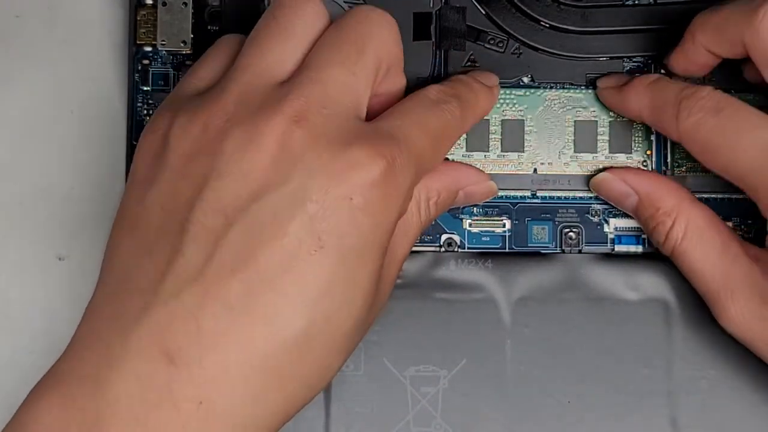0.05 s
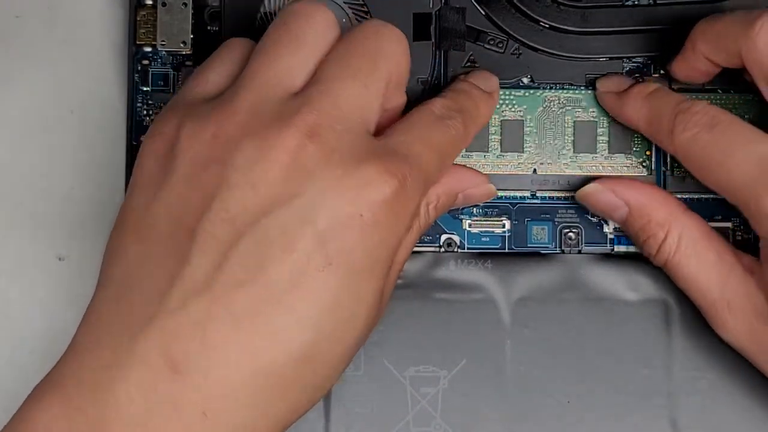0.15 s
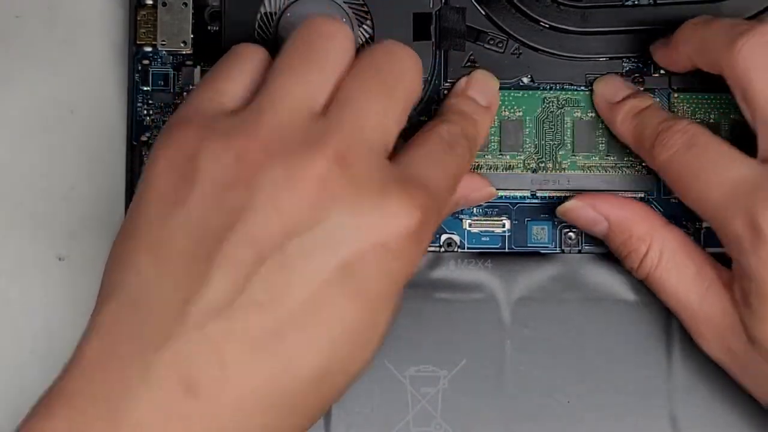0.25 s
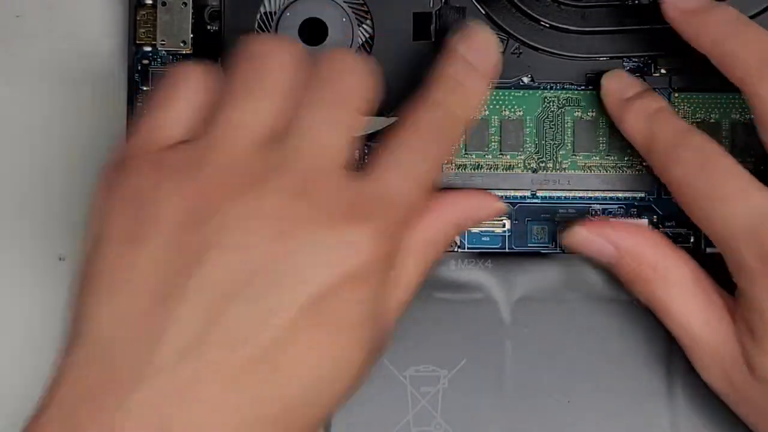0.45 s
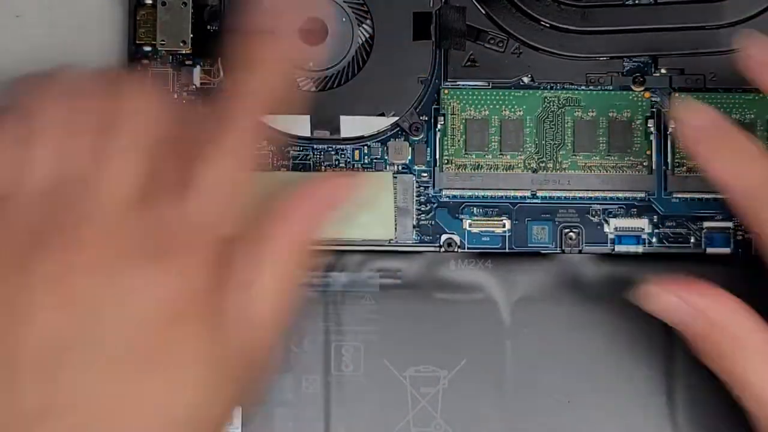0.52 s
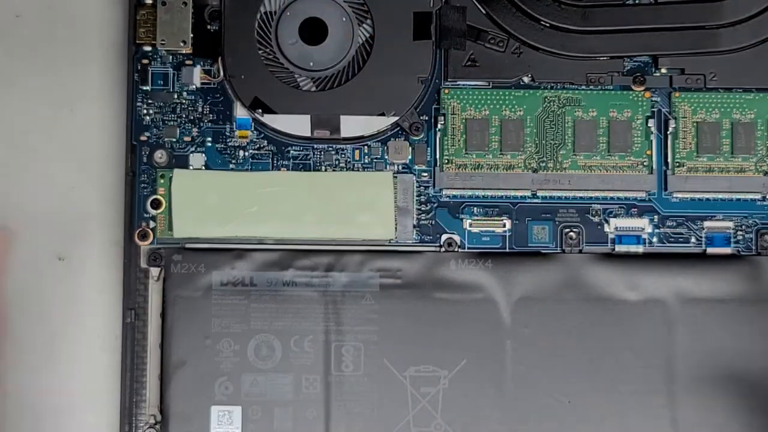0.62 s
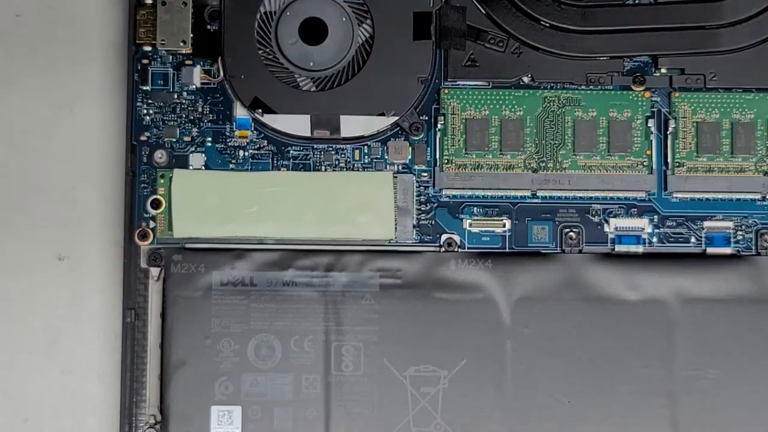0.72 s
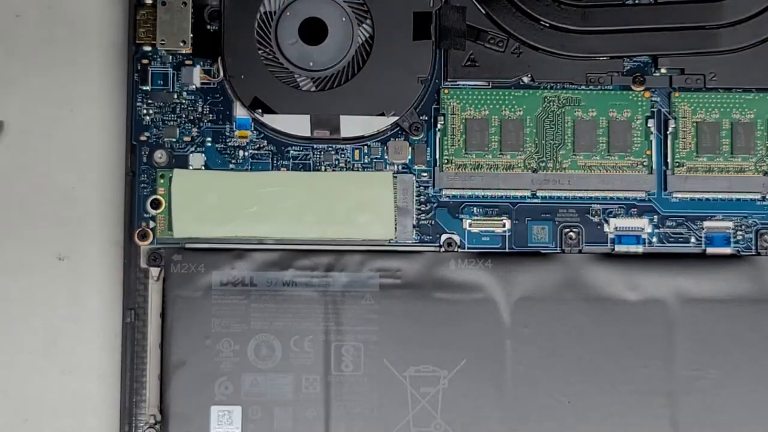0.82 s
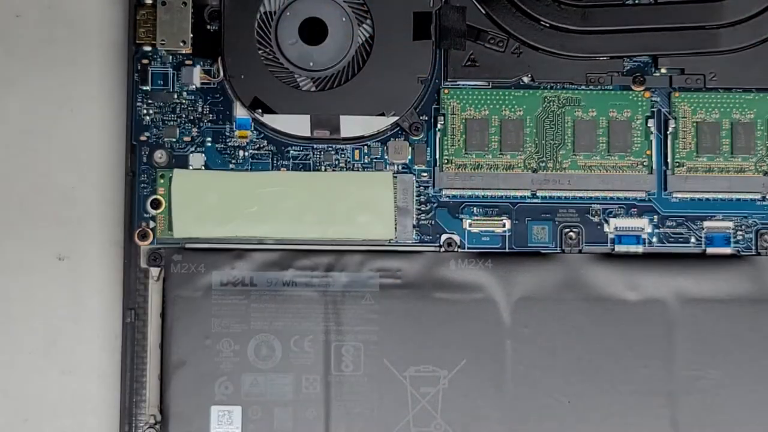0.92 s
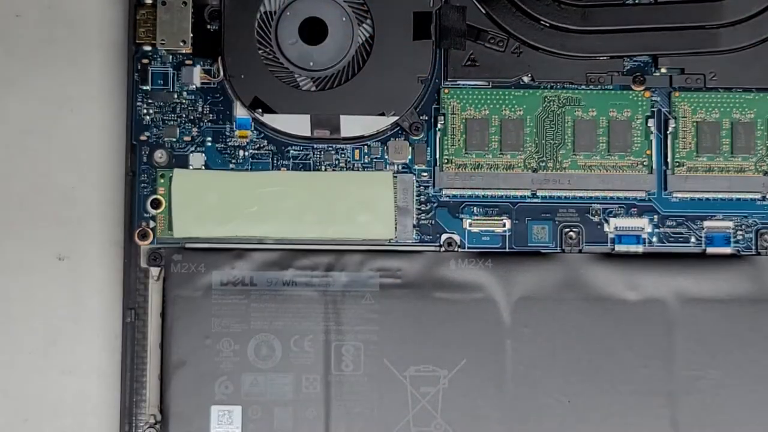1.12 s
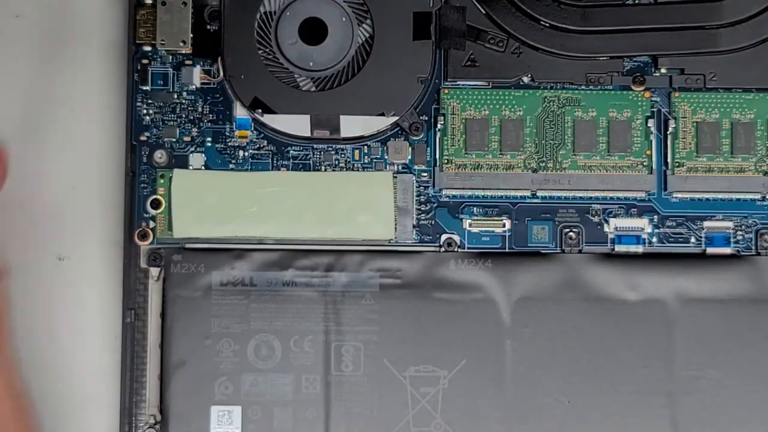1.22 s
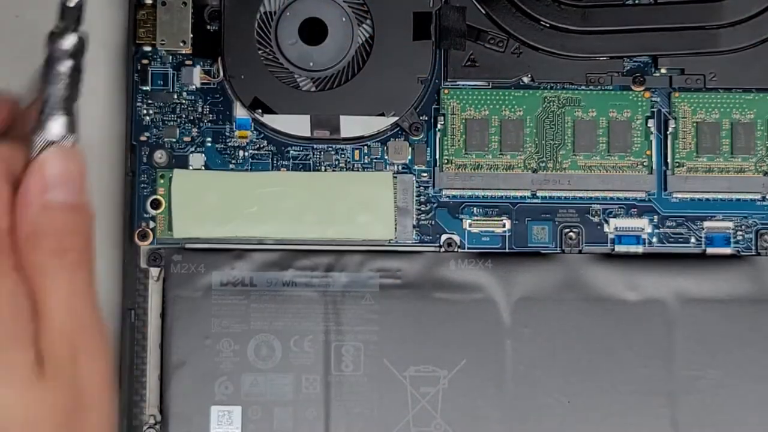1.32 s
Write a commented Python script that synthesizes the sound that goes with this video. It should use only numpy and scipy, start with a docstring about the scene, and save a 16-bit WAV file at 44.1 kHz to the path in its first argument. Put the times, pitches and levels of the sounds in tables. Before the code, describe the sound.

A memory module snaps into its laptop slot with a quick run of sharp latch clicks. Faint ticks, soft desk bumps and a dull rub follow as small things are handled, heard close in a small room with low rumble.

```python
"""Spring latches snap shut on a memory module pushed into its slot in an open laptop on a desk:
a quick run of cracks that ring the board, a brief hiss swelling into the first loud one. Later, small
things handled nearby give faint ticks, soft bumps and a dull rub. Low room rumble and faint hiss lie
underneath. Heard in a small room through two spaced microphone ports."""
import sys
import numpy as np
from scipy import signal
from scipy.fft import rfft, irfft
from scipy.io import wavfile

SR = 44100
rng = np.random.default_rng(int(sys.argv[2]) if len(sys.argv) > 2 else 0)


def wav_record(signal):
    """Record a signal, one row per channel, as 16-bit PCM in the file named by sys.argv[1]."""
    frames = np.transpose(np.atleast_2d(signal))
    bounded = np.clip(frames, -1, 1)
    # unit amplitude maps onto the largest positive 16-bit level
    quanta = np.round(bounded * 32767).astype(np.int16)
    wavfile.write(sys.argv[1], SR, quanta)


N = 59535


def latches():
    """Each crack is a bright burst that rings the board; where it strikes decides which modes ring most."""
    # t/s, level/dB, lows/dB, highs/dB, rattle t60/s, left-right/dB, favoured f/Hz, its lift/dB
    cracks = [(0.1703, -52, -2.5, -7.5, 0.25, -3.5, 4800, 4.5),
              (0.2016, -7.5, 3.5, -3, 0.022, -4.5, 3200, 8), (0.2064, -9.5, 2, -2.5, 0.011, 0, 6300, 5.5),
              (0.209, -19.5, -0.5, 3.5, 0.03, 3, 1550, 7), (.2200, -13.5, 0, -0.5, 0.02, -8, 1290, 3.5),
              (0.2243, -27.5, 5, 4.5, 0.1, 3, 1290, 2), (0.2363, -15, 6, 1.5, 0.026, -1, 1590, 10),
              (0.2407, -24.5, 0, 0, 0.055, 0.5, 2000, 5)]
    # board and latch modes: f/Hz, level/dB, t60/s
    modes = [(109, -22, 0.12), (406.2, -28, .2), (685, -17, 0.037), (853, -16, 0.026), (1290, -6, 0.039),
             (1570, -2.5, 0.0098), (1957, -10.5, 0.0041), (2860, -16, 0.023), (3115, -7, 0.0048),
             (3860, 1, 0.005), (4830, -8, .006), (5620, 0, 0.0036), (5900, -6.5, 0.0033), (6830, -8, 0.01),
             (8750, -4.5, .003), (10050, -16.5, 0.0034), (13800, -2.5, 0.0014)]
    crack_db, scatter_db, lift_width_oct = 5.5, 2.5, 0.24
    detune = 0.038  # the flexing board shifts its modes from crack to crack
    highpass = signal.butter(2, 2600, "high", fs=SR, output="sos")
    out = np.zeros((2, N))
    for start_s, level_db, lows_db, highs_db, t60_s, pan_db, favoured_hz, lift_db in cracks:
        burst = rattle(t60_s, attack_s=0.00026, spike_db=4.5, lag_s=0.00012)
        tilt = [(900, lows_db), (1250, 0), (13000, highs_db)]  # f/Hz, level/dB
        sound = amp(crack_db + highs_db) * match_decay_energy(signal.sosfilt(highpass, burst), t60_s)
        for hz, mode_db, ring_s in modes:
            strike_db = lift_db * np.exp(-(np.log2(hz / favoured_hz) / lift_width_oct) ** 2)
            gain = amp(mode_db + at_hz(tilt, hz) + strike_db + scatter_db * rng.standard_normal((2, 1)))
            hz *= 1 + detune * rng.uniform(-1, 1)
            drive = resonance(burst, hz, width_hz=hz)
            ring = resonance(drive, hz, mode_width_hz(ring_s))
            sound += gain * match_decay_energy(ring, t60_s) / 2
        place(out, start_s, amp(level_db) * sound, pan_db)
    return out


def noise_swell():
    """A brief hiss around 4 kHz swells into the first loud crack."""
    end_s, rise_s = 0.2022, 0.0051
    t = np.arange(N) / SR - end_s
    swell = np.exp(np.minimum(t, 0) / rise_s) * (t < 0)
    return amp(-15.5) * swell * resonance(rng.standard_normal((2, N)), hz=4300, width_hz=4300)


def ticks():
    """Small hard contacts: a grainy burst through a broad resonance, plus a sheen that dies sooner."""
    # t/s, level/dB, f/Hz, width/Hz, sheen/dB, t60/s, left-right/dB
    contacts = [(0.3995, -70, 10100, 4000, 9, 0.034, -10), (0.4069, -63.5, 6830, 1020, 6.5, 0.078, -7),
                (0.427, -66.5, 10400, 1005, 8, 0.029, -3), (0.7529, -37.5, 3600, 1834, -20, 0.079, -2),
                (0.7587, -32, 6140, 1960, 0.5, 0.049, -4), (0.802, -32.5, 3060, 1980, -18, 0.079, -0.5),
                (.8075, -33.5, 3350, 2200, -11, 0.032, -3.5), (0.8165, -29, 6470, 2310, 1.5, 0.035, -5),
                (0.821, -30.5, 5740, 2400, 4.5, 0.036, 2), (0.8759, -42, 6020, 2760, 6.5, 0.11, -1.5),
                (0.912, -57.5, 2910, 900, -18, 0.18, -4), (0.936, -48, 2980, 1500, -2.5, 0.045, 0),
                (0.937, -47, 5560, 2500, -1, 0.052, 0), (1.0121, -35, 5930, 2450, -2, 0.056, 1.5),
                (1.0118, -38, 3430, 1180, -1.5, 0.036, -3), (1.0395, -47.5, 5200, 2500, 0, 0.076, -1),
                (1.058, -52, 3270, 718, -16, 0.067, 2), (1.1047, -32.5, 7700, 2550, 2, 0.0057, 1),
                (1.1083, -40, 6260, 3580, -23, 0.062, -4.5), (1.1487, -37.5, 5230, 700, -4, 0.028, 1.5),
                (1.1486, -42.5, 7200, 2550, -6, 0.038, -4), (1.148, -47.5, 10540, 1200, -18, 0.025, 4),
                (1.179, -43.5, 5240, 2493, 2.5, 0.02, 2), (1.195, -47, 6600, 2650, 0, 0.049, -5),
                (1.2227, -48, 5310, 805, -13, 0.05, -2), (1.2235, -60, 7660, 794, -15, .05, -7),
                (1.3391, -28.5, 4660, 940, 0.5, 0.019, -9), (1.3435, -43, 4470, 1200, 2, 0.15, 1)]
    sheen_t60_s = 0.14
    out = np.zeros((2, N))
    for start_s, level_db, hz, width_hz, sheen_db, t60_s, pan_db in contacts:
        burst = rattle(t60_s, attack_s=0.00036, spike_db=2, lag_s=-0.0001)
        t = np.arange(burst.shape[1]) / SR
        tone = match_decay_energy(double_resonance(burst, hz, width_hz), t60_s)
        sheen = amp(sheen_db - 60 * t / sheen_t60_s) * resonance(burst, hz=12260, width_hz=9300)
        place(out, start_s, amp(level_db) * (tone + sheen), pan_db)
    return out


def desk_bumps():
    """Dull knocks through the desk: a short push rings one low mode, alike at both ports."""
    # t/s, level/dB, f/Hz, t60/s
    knocks = [(0.756, -44, 443, 0.053), (.764, -40.5, 401, 0.083), (.77, -48, 117, 0.052),
              (0.805, -44.5, 361.3, 0.15), (0.804, -40.5, 1821, 0.05), (0.805, -47, 873, 0.11),
              (0.831, -52, 1181, 0.08), (0.852, -42.5, 610, 0.072), (1.179, -54.5, 1470, 0.028),
              (1.34, -49, 1420, 0.031)]
    out = np.zeros((2, N))
    for start_s, level_db, hz, t60_s in knocks:
        push = rattle(t60_s, attack_s=0.00082, spike_db=4.5, lag_s=0)[[0, 0]]
        ring = resonance(push, hz, mode_width_hz(t60_s))
        place(out, start_s, amp(level_db) * match_decay_energy(ring, t60_s), pan_db=0)
    return out


def desk_rub():
    """Something slides on the desk: dull, grainy friction noise."""
    # t/s, level/dB
    envelope = [(0.748, -57), (0.755, -37.5), (0.788, -46.5), (0.811, -38.5), (0.859, -51), (.89, -59.5),
                (.96, -67), (1.121, -63), (1.158, -53.5), (1.21, -66), (1.272, -84), (1.35, -51)]
    # f/Hz, relative density/dB
    spectrum = [(100, -4.5), (200, -2), (350, -2), (600, -7), (1500, -11), (3500, -8), (7000, -11),
                (9000, -28), (16000, -14)]
    grain_db = 3
    grains = rng.standard_normal((2, N)) * amp(grain_db * np.minimum(rng.exponential(1, N), 4))
    friction = irfft(rfft(grains) * amp(at_hz(spectrum, bins_hz())), N)
    level_db = np.interp(np.arange(N) / SR, *np.transpose(envelope), left=-120, right=-120)
    return amp(level_db) * unit_rms(friction)


def rattle(t60_s, attack_s, spike_db, lag_s):
    """A contact's spike and decay: shared grains, time-shifted at left, plus separate noise per port."""
    spike_t60_s, grain_db, share = 0.004, 3, 0.55
    t = np.arange(SR // 4) / SR
    port_noise, noise = rng.standard_normal((2, len(t))), rng.standard_normal(len(t))
    grain_size = np.minimum(rng.exponential(1, len(t)), 4)
    common = np.sqrt(share) * noise * amp(grain_db * (grain_size - 2.5))
    ports = np.sqrt(1 - share) * port_noise + [np.roll(common, int(lag_s * SR)), common]
    decay = amp(-60 * t / t60_s) + amp(spike_db - 60 * t / spike_t60_s)
    return (1 - np.exp(-t / attack_s)) * decay * ports


def room(x):
    """Dense reflections: octave bands of noise, each dying at its own rate."""
    decay = [(200, 0.2), (1300, 0.13), (2200, 0.19), (6000, 0.22), (15000, 0.2)]  # f/Hz, t60/s
    level_db, gap_s = -13, 0.003
    t, tail = np.arange(SR // 2) / SR, 0
    for hz in 125 * 2. ** np.arange(8):
        edges_hz = [hz / np.sqrt(2), min(hz * np.sqrt(2), SR / 2.2)]
        band = signal.butter(2, edges_hz, "band", fs=SR, output="sos")
        tail += signal.sosfilt(band, rng.standard_normal((2, len(t)))) * amp(-60 * t / at_hz(decay, hz))
    tail = tail * (t > gap_s) / np.sqrt(np.sum(tail ** 2) / 2)
    return amp(level_db) * signal.fftconvolve(x, tail, axes=1)[:, :N]


def background():
    """Room rumble and hiss, alike at both ports in the bass, with a wavering drone near mains pitch."""
    # f/Hz, relative density/dB
    spectrum = [(12, -44), (20, -13), (77, -8), (184, -24), (218, -30), (465, -34), (670, -35), (2060, -43),
                (2660, -43), (6000, -50), (9400, -56), (12000, -53), (14500, -50), (16000, -51)]
    # f/Hz, left-right correlation
    correlation = [(60, .93), (240, .75), (950, .2), (3770, .1), (15000, -.2)]
    mid, side = rfft(rng.standard_normal((2, N))) * amp(at_hz(spectrum, bins_hz()))
    alike = at_hz(correlation, bins_hz())
    air = irfft(np.sqrt(1 + alike) * mid + np.sqrt(1 - alike) * side * [[1], [-1]], N)
    drone = double_resonance(rng.standard_normal(2 * N), hz=62.5, width_hz=13)[N:]
    return amp(-53.5) * unit_rms(air) + amp(-52) * unit_rms(drone)


def amp(db):
    return 10 ** (np.asarray(db) / 20)


def unit_rms(x):
    return x / np.sqrt(np.mean(x ** 2) + 1e-20)


def bins_hz():
    return np.maximum(np.arange(N // 2 + 1) * SR / N, 1)


def at_hz(points, hz):
    points_hz, values = np.transpose(points)
    return np.interp(np.log(hz), np.log(points_hz), values)


def mode_width_hz(t60_s):
    return np.log(1000) / np.pi / t60_s


def resonance(x, hz, width_hz):
    """Two-pole band-pass, gain 1 at the centre."""
    r = np.exp(-np.pi * width_hz / SR)
    feedback = [1, -2 * r * np.cos(2 * np.pi * hz / SR), r * r]
    return signal.lfilter([(1 - r * r) / 2, 0, (r * r - 1) / 2], feedback, x)


def double_resonance(x, hz, width_hz):
    return resonance(resonance(x, hz, width_hz), hz, width_hz)


def match_decay_energy(x, t60_s):
    """Scale each channel to the energy of unit noise dying over t60_s."""
    return x * np.sqrt(t60_s * SR / np.log(1e6) / np.sum(x ** 2, axis=-1, keepdims=True))


def place(out, start_s, sound, pan_db):
    i = int(start_s * SR)
    n = min(sound.shape[1], N - i)
    out[:, i:i + n] += sound[:, :n] * amp([[pan_db / 2], [-pan_db / 2]])


def scene():
    """Contacts in the room over the background; long waves reach both ports alike."""
    direct = noise_swell() + latches() + ticks() + desk_bumps() + desk_rub()
    heard = direct + room(direct)
    lowpass = signal.butter(1, 1100, fs=SR, output="sos")
    crossfeed = signal.sosfilt(lowpass, heard[::-1] - heard) / 2
    return heard + crossfeed + background()


def record(dry):
    """Low-pass, soft clip, low-pass again."""
    stop_hz, ceiling = 16750, 0.88
    lowpass = signal.cheby2(16, 80, stop_hz, fs=SR, output="sos")
    clipped = ceiling * np.tanh(signal.sosfilt(lowpass, dry) / ceiling)
    return signal.sosfilt(lowpass, clipped)


dry = scene()
out = record(dry)
wav_record(out)
```